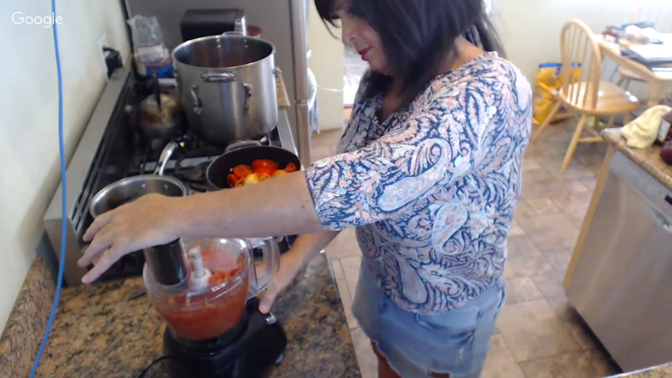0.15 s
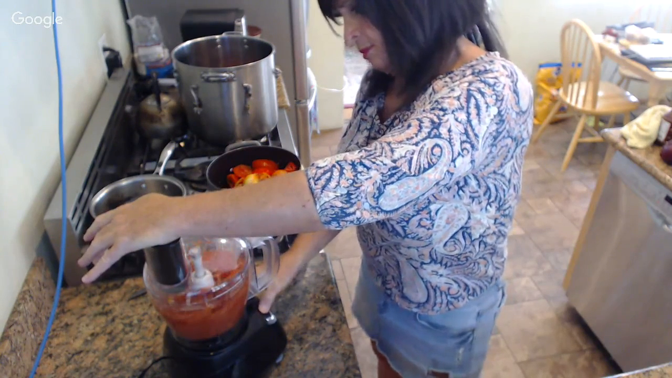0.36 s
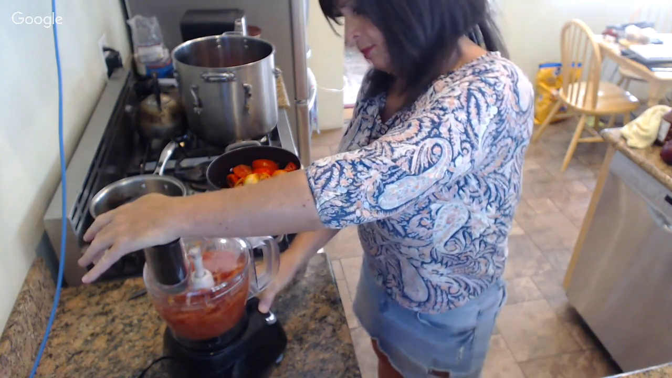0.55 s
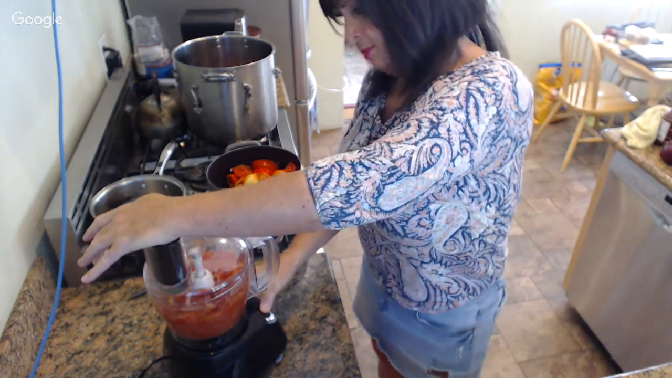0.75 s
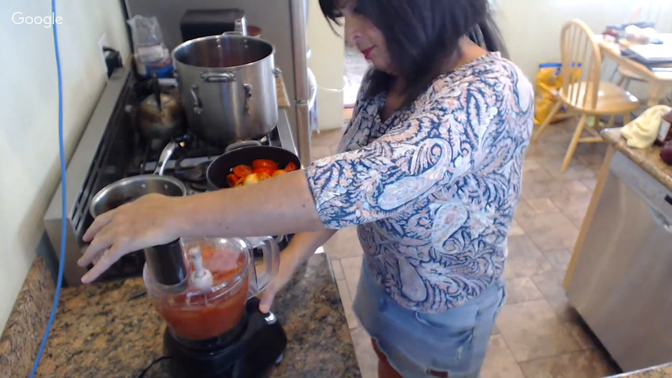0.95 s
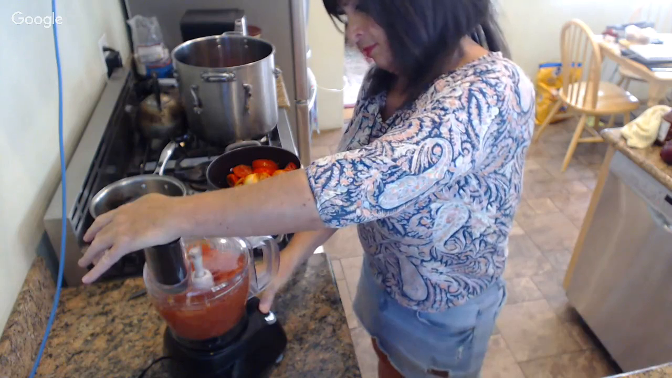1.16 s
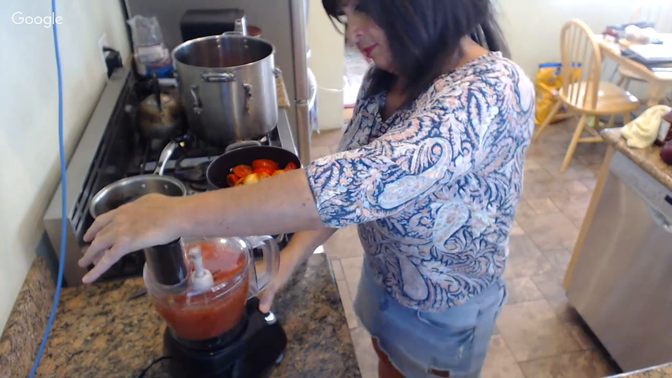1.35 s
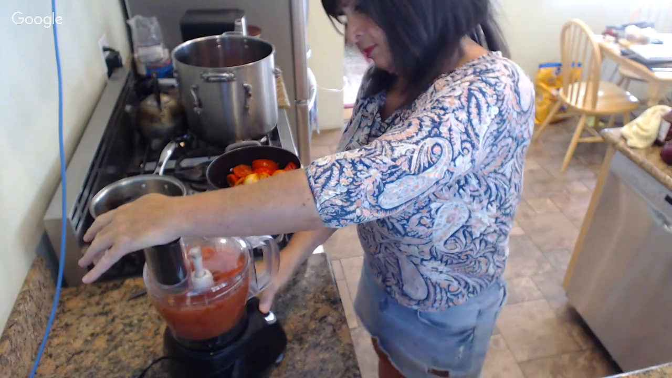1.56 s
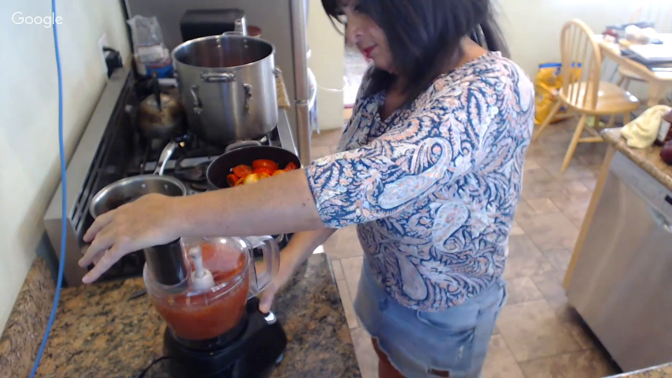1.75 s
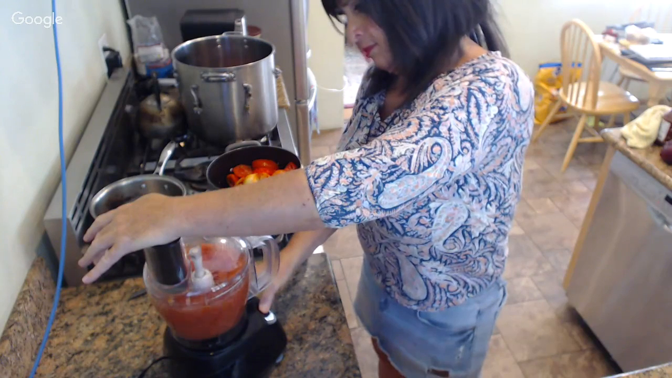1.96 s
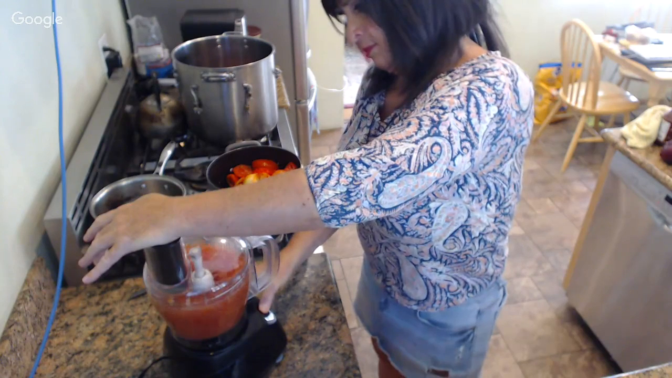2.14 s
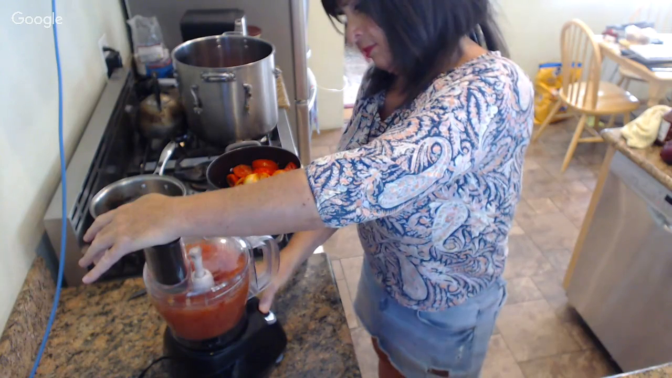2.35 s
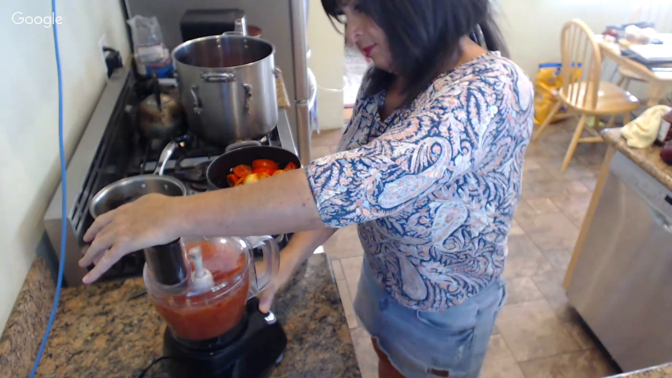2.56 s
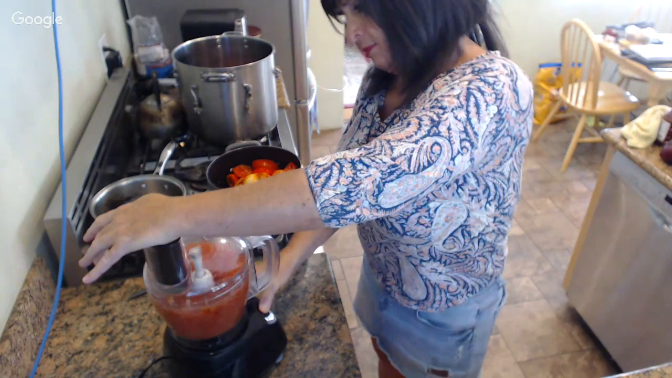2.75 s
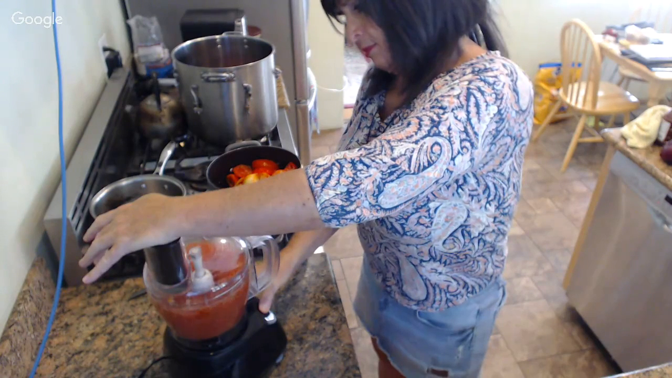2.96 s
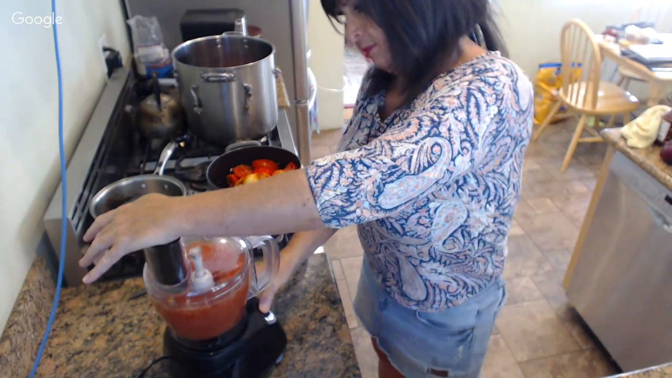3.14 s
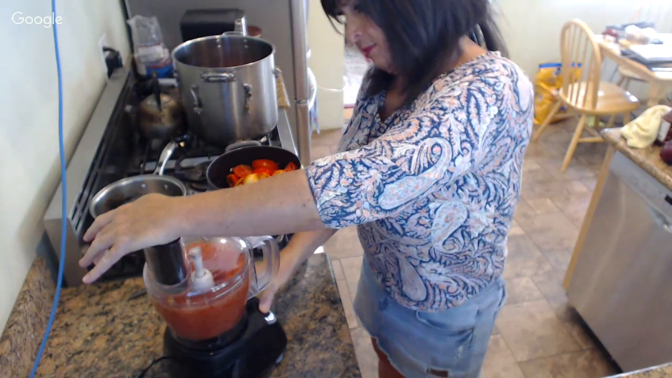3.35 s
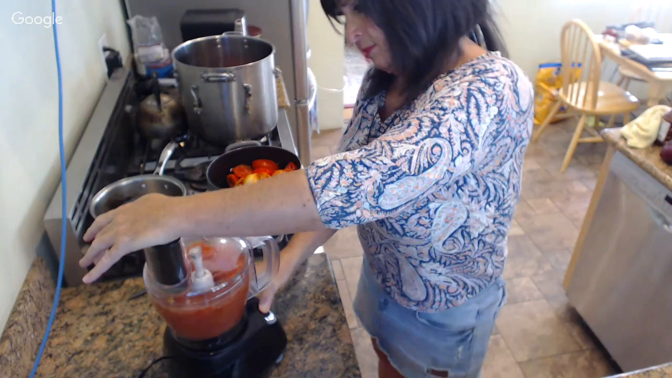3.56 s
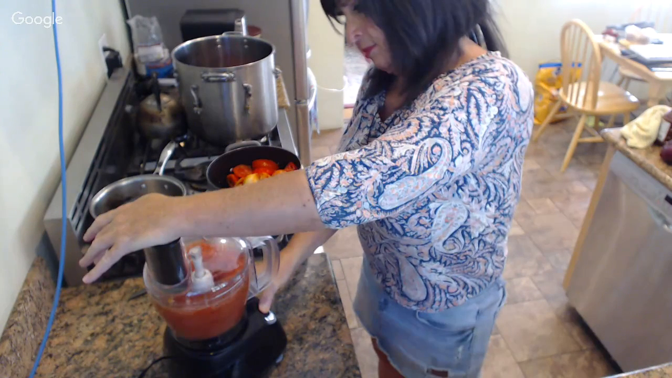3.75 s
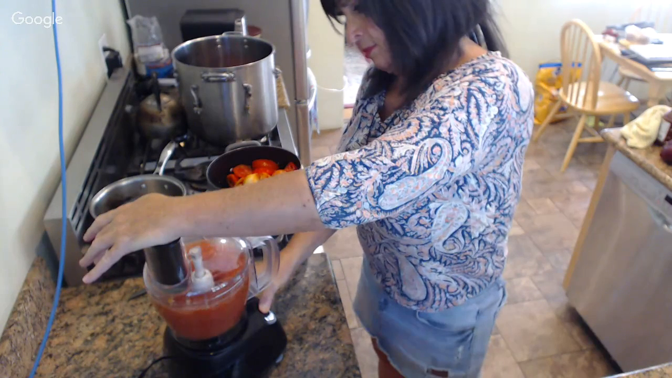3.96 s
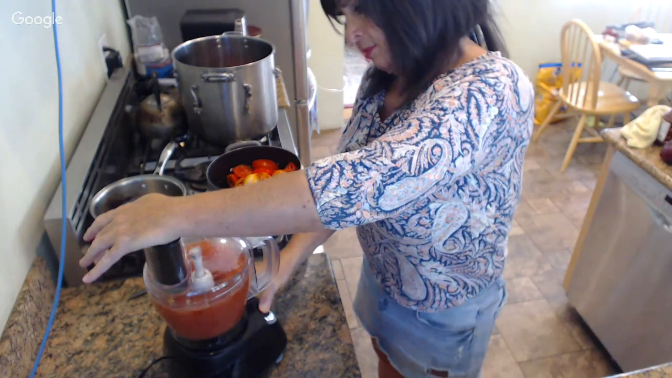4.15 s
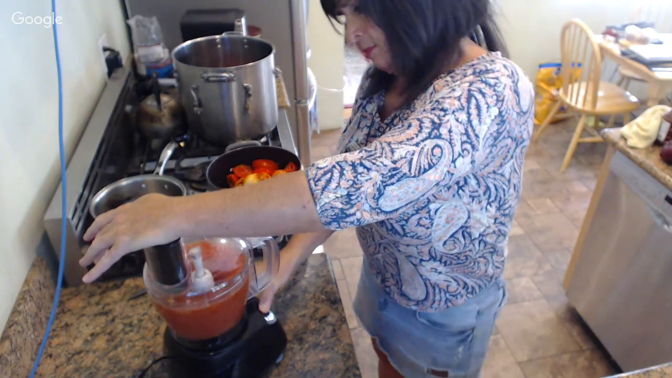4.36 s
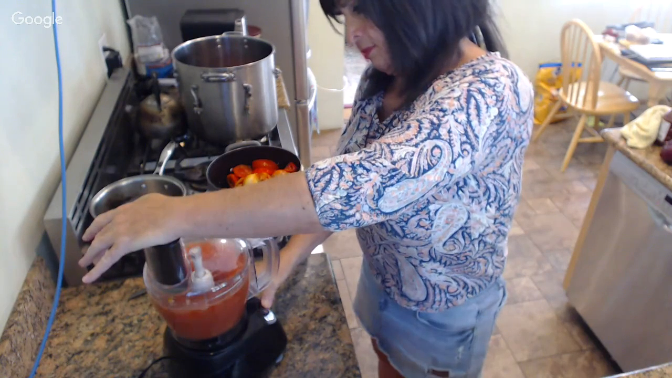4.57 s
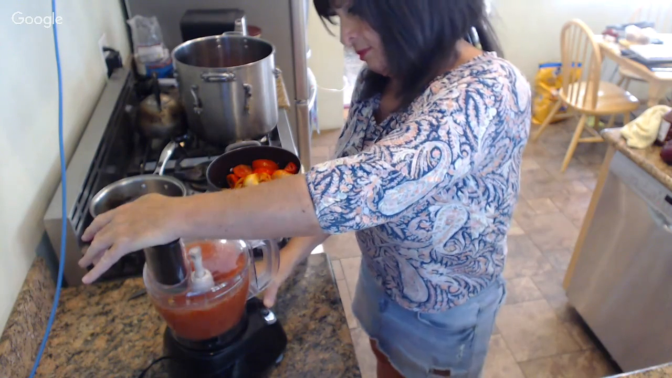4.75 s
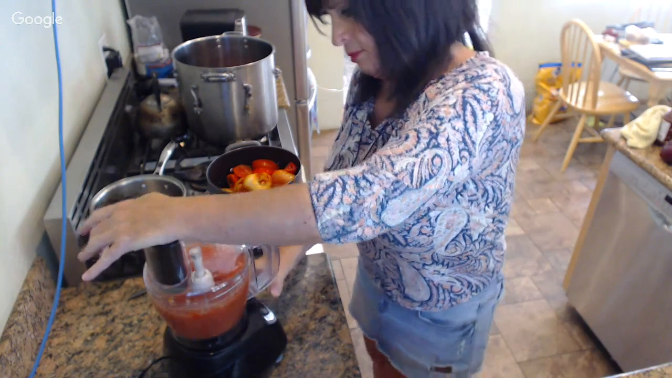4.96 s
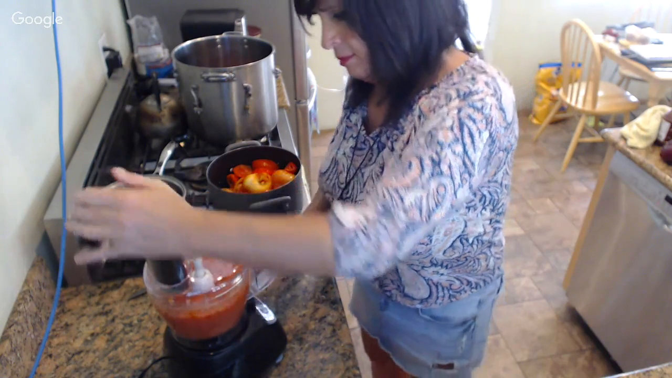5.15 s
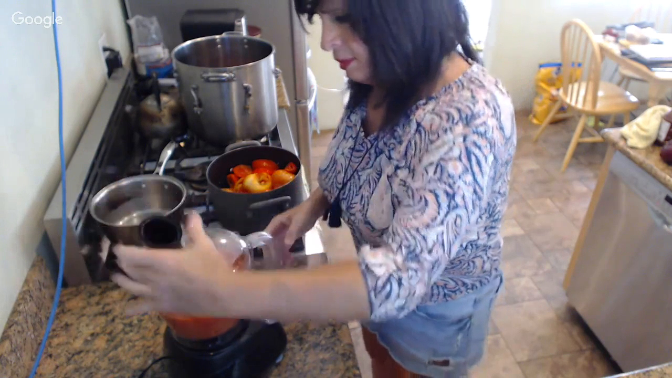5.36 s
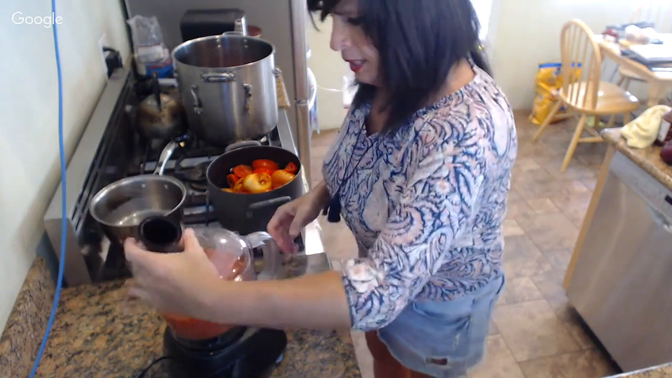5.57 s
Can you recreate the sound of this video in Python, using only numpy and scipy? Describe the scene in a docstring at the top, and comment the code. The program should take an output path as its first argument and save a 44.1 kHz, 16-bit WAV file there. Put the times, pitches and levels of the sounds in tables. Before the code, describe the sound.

Close, slightly dull small microphone in a home kitchen: the tail of one food processor pulse runs down to near silence, then the motor starts with a knock and loud roar. Wet tomato pulp glugs and slosh-slaps the bowl, thinning into a steadier whirr with brief high chirps, dropouts and scrapes, before the machine growls, whines and coasts to a stop, leaving faint hush.

```python
"""A food processor chops tomatoes on a kitchen counter; shaped noise makes its whirr, hiss, pulp and room.
First one pulse runs down; then a jolt of low and higher tones and a loud, sagging roar open a long run.
Wobbling tones glug and noise bursts slosh as pulp churns in the bowl and settles into sauce; blades throb.
High whistles chirp over short dropouts, fizz flickers, bits of skin scrape and the blade sings thinly.
The motor growls, rasps and whines as it coasts to a stop; a faint hush is left."""
import sys
import numpy as np
from scipy import signal
from scipy.fft import rfft, irfft
from scipy.io import wavfile

SR = 44100
rng = np.random.default_rng(int(sys.argv[2]) if len(sys.argv) > 2 else 0)


def transcribe(u):
    """Save the signal u as a 16-bit wav file named by the first command-line argument.

    u: samples, shape (n,) or (channels, n), limited to [-1, 1]; the rate is SR.
    q: integer samples, one column per channel.
    """
    v = np.clip(np.atleast_2d(u).T, -1, 1)
    q = np.round(v * 32767).astype(np.int16)
    wavfile.write(sys.argv[1], SR, q)


N = 247401
TIME = np.arange(N) / SR   # s


def from_db(db):
    """Turn decibels into a gain."""
    return 10 ** (np.asarray(db) / 20)


def rms_one(x):
    """Scale to an rms (average strength) of 1."""
    return x / np.sqrt(np.mean(x ** 2) + 1e-20)


def drift(rate):
    """Smooth chance that changes about rate times a second; spread 1."""
    hz = np.arange(N // 2 + 1) * SR / N
    smooth = rfft(rng.standard_normal(N)) / (1 + (hz / rate) ** 2)
    return rms_one(irfft(smooth, N))


def bounded(x, limit=0.95):
    """Round off the extremes of a chance curve."""
    return limit * np.tanh(x / limit)


def swell(at, length, order=2):
    """A bell of height 1, length wide at half height; a higher order squares it off."""
    distance = np.abs(2 * (TIME - at) / length)
    return np.exp2(-np.minimum(distance ** order, 60))


def below(speed, threshold, softness=0.025):
    """0 above a speed, 1 below it, with a soft step between."""
    return 0.5 - 0.5 * np.tanh((speed - threshold) / softness)


def in_time(rows):
    """Each column of a curve, joined by straight lines in time."""
    s, *columns = np.transpose(rows)
    return [np.interp(TIME, s, column) for column in columns]


def turbulence(spectrum, resonances=(), liveliness=1):
    """Noise with a broad colour, lifted at each resonance by its lift times liveliness; rms 1."""
    hz = np.arange(N // 2 + 1) * SR / N + 1e-3   # the small offset avoids log of 0
    points_hz, points_db = np.transpose(spectrum)
    colour = np.interp(np.log(hz), np.log(points_hz), points_db)
    # above the last point the colour falls steeply
    colour = colour - 80 * np.log10(np.maximum(hz / points_hz[-1], 1))
    for centre, width, lift in resonances:
        colour = colour + liveliness * lift / (1 + (2 * (hz - centre) / width) ** 2)
    return rms_one(irfft(rfft(rng.standard_normal(N)) * from_db(colour), N))


def wavering(x, wander=0.012, flicker_db=2.5, bend=0):
    """Shifting pulp moves a resonance in pitch, on top of any steady bend, and makes it come and go."""
    shift_s = np.cumsum(bend + wander * drift(12)) / SR
    bent = np.interp(TIME + shift_s, TIME, x)
    return rms_one(bent * from_db(flicker_db * drift(21)))


# colour of the quiet kitchen: (f/Hz, relative level/dB)
ROOM_COLOUR = [(35, -19.5), (60, -2), (77, -9), (328, 1.5), (600, -12.5), (8000, -27.5), (10400, -61)]


def room():
    """Soft, steady noise fills the quiet kitchen."""
    return from_db(-80) * turbulence(ROOM_COLOUR)


# colour of the faint hush: (f/Hz, relative level/dB)
HUSH_COLOUR = [(18, -35), (30, -14), (234, -8), (532, -9), (2040, -13.5), (7000, -38), (9100, -75.5)]


def hush(level_db=-62.5, start_s=5.432, rise_s=0.01):
    """A faint noise comes up as the machine nears standstill, and stays."""
    return from_db(level_db) * turbulence(HUSH_COLOUR) * np.clip((TIME - start_s) / rise_s, 0, 1)


def fizz_noise():
    """Fine, high fizz made of noise; rms 1."""
    return turbulence([(3000, -20), (6000, -7.5), (7400, -3.5), (8200, -19.0), (9200, -19)])


# moments when the treble fizzes: (t/s, length/s, level/dB)
FIZZ_BURSTS = [(1.999, 0.058, -36), (2.293, 0.03, -38.5), (4.153, 0.034, -39.5)]


def fizz():
    """Short bursts of fine, high fizz."""
    level = sum(from_db(db) * swell(s, length, order=4) for s, length, db in FIZZ_BURSTS)
    return fizz_noise() * level


# chirps and the dropouts under them: (t/s, dropout length/s, chirp level before flutter/dB,
# level change of the machine/dB)
CHIRP_EVENTS = [(1.616, 0.027, -50, -13.5), (3.583, 0.021, -38, -29), (4.085, 0.0065, -37, 1),
                (4.227, 0.011, -38.5, -12.5), (4.245, 0.0083, -42, -7), (4.339, 0.008, -35.5, -18),
                (4.423, 0.013, -37, -9), (4.439, 0.015, -35, -8.5), (4.534, 0.012, -38.5, -9.5),
                (4.58, 0.01, -39, -5.5)]


def chirps(pitch_hz=8060, wobble=0.013, flutter_db=3.0, stretch=1.62, fringe_db=-0.5):
    """Short, slightly unsteady whistles around one high pitch, fringed with fizz."""
    # stretch: a chirp outlasts its dropout
    level = sum(from_db(db) * swell(s, stretch * length, order=6) for s, length, db, _ in CHIRP_EVENTS)
    cycles = np.cumsum(pitch_hz * (1 + wobble * drift(290))) / SR
    tone = np.sqrt(2) * np.sin(2 * np.pi * cycles)
    fringe = turbulence([(5000, -14.5), (7150, 6), (7650, 7.5), (8300, -16), (9300, -1)])
    return (tone + from_db(fringe_db) * fringe) * level * from_db(flutter_db * drift(110))


def dropouts():
    """The machine's level changes briefly at each chirp, nearly always a dip."""
    return from_db(sum(change_db * swell(s, length, order=6) for s, length, _, change_db in CHIRP_EVENTS))


# thin singing of the steel blade: (t/s, length/s, f/Hz, width/Hz, level/dB)
BLADE_SONGS = [(3.82, 0.3, 6000, 18, -51.5), (4.55, 0.55, 5220, 160, -53)]


def blade_rings():
    """Rubbed by the pulp, the blade rings in narrow, high bands."""
    total = 0
    for s, length, hz, width, db in BLADE_SONGS:
        turn = 2 * np.pi * hz * TIME
        band = drift(width) * np.sin(turn) + drift(width) * np.cos(turn)
        total = total + from_db(db) * swell(s, length, order=4) * band
    return total


# colour of skin against the wall: (f/Hz, relative level/dB)
SCRAPE_COLOUR = [(1900, -17), (2550, 1.5), (3100, 4), (3700, -3), (4300, -11), (5500, -24)]
# bits of skin scraping round the wall once the blades cut clear: (t/s, length/s, level/dB)
SKIN_SCRAPES = [(3.77, 0.27, -38.5), (4.024, 0.19, -38), (4.296, 0.061, -38), (4.491, 0.079, -37.5)]


def scrapes(grain_db=5):
    """Bits of skin dragged along the wall give a rough, bright rasp."""
    grains = rms_one(turbulence(SCRAPE_COLOUR) * from_db(grain_db * bounded(drift(120))))
    return grains * sum(from_db(db) * swell(s, length, order=4) for s, length, db in SKIN_SCRAPES)


# waves of pulp thrown against the wall: (t/s, centre f/Hz, length/s, level/dB)
PULP_WAVES = [(1.765, 614, 0.044, -17), (1.892, 490, 0.024, -13), (1.901, 730, 0.07, -20.5),
              (1.95, 470, 0.041, -21), (1.982, 640, 0.042, -17), (2.133, 600, 0.044, -23),
              (2.216, 560, 0.094, -16), (2.337, 520, 0.048, -20), (2.406, 426, 0.029, -19),
              (2.491, 510, 0.063, -22.5), (2.533, 474, 0.023, -21), (2.571, 505, 0.044, -18),
              (2.759, 445, 0.035, -25.5), (3.245, 430, 0.029, -30), (3.613, 384, 0.014, -24)]


def sloshes(edge_db=-5, skirt_db=-30):
    """Each wave of pulp slaps the wall with a wet burst about an octave wide."""
    total = 0
    for s, hz, length, db in PULP_WAVES:
        low_side = [(hz / 2, skirt_db), (hz / np.sqrt(2), edge_db)]
        high_side = [(hz * np.sqrt(2), 2 * edge_db), (hz * 2, skirt_db)]
        burst = turbulence(low_side + [(hz, 0)] + high_side)
        total = total + from_db(db) * swell(s, length, order=4) * burst
    return total


# air pockets folding into the pulp: (t/s, f before wobble/Hz, length/s, level before flutter/dB)
AIR_POCKETS = [(0.14, 276.6, 0.043, -45.5), (0.293, 255, 0.071, -54), (1.212, 231, 0.03, -19.5),
               (1.586, 210, 0.025, -15.5), (1.765, 148.8, 0.019, -16.5), (1.815, 292.7, 0.022, -17),
               (1.875, 175, 0.025, -15), (1.966, 231.3, 0.031, -14), (2.012, 245.6, 0.012, -10),
               (2.05, 165, 0.0088, -14), (2.08, 210, 0.013, -13), (2.118, 150, 0.026, -15),
               (2.171, 290, 0.023, -17), (2.242, 200, 0.033, -17.5), (2.306, 185, 0.028, -18.5),
               (2.398, 149, 0.025, -12.5), (2.431, 370.5, 0.015, -13.5), (2.509, 189.7, 0.014, -19.5),
               (2.535, 237, 0.021, -23), (2.659, 345, 0.012, -17), (2.699, 148, 0.02, -19),
               (2.755, 340, 0.016, -18), (2.998, 319.3, 0.035, -25.5), (3.375, 155, 0.022, -27),
               (4, 185, 0.024, -38.5), (4.162, 147, 0.032, -32), (4.257, 245, 0.026, -27),
               (4.378, 267, 0.0098, -25), (4.401, 239.5, 0.016, -26), (4.465, 153, 0.027, -34),
               (4.618, 225, 0.06, -48), (5.172, 676, 0.02, -56.5), (5.198, 269, 0.02, -57.5),
               (5.307, 302, 0.016, -65), (5.328, 480, 0.016, -70)]
# colour of wet splashing, also used for the pulp below: (f/Hz, relative level/dB)
SPLASH_COLOUR = [(150, -32.5), (330, -0.5), (430, 2.5), (650, 0), (850, -4.5), (1100, -17), (1800, -23)]


def glugs(wobble=0.084, flutter_db=4.0, slap_db=-12):
    """Each air pocket closes with a wet slap and rings at a pitch that wobbles as the pulp squeezes it."""
    squeezed_time = np.cumsum(1 + wobble * drift(92.5)) / SR
    slap = from_db(slap_db) * turbulence(SPLASH_COLOUR)
    pockets = 0
    for s, hz, length, db in AIR_POCKETS:
        ring = np.sqrt(2) * np.sin(2 * np.pi * hz * squeezed_time)
        pockets = pockets + from_db(db) * swell(s, length) * (ring + slap)
    return pockets * from_db(flutter_db * drift(110))


# colour of the low churn: (f/Hz, relative level/dB)
CHURN_COLOUR = [(25, -4.5), (55, -14), (80, -21), (100, -9), (125, -1), (240, 2), (330, -0.5), (450, -9),
                (800, -32)]


def pulp(splash_db, churn_db, load, slosh_db=1.0, lumps_db=1.46, loose_lumps_db=4.5):
    """Lumps thrown round the bowl: a low churn and a wet, sloshing splash that surge together."""
    churn = from_db(churn_db) * turbulence(CHURN_COLOUR)
    splash = from_db(splash_db + slosh_db * bounded(drift(25))) * turbulence(SPLASH_COLOUR)
    # the pulp is less even when the blades cut clear
    unevenness_db = lumps_db + loose_lumps_db * (1 - load)
    return (churn + splash) * from_db(unevenness_db * bounded(drift(27)))


# low and higher rings of the jolt: (f/Hz, starting level/dB, time to fall 60 dB/s)
JOLT_RINGS = [(109.5, -25, 0.38), (200, -35.5, 0.091), (520, -36, 0.06), (1480, -24.5, 0.07)]


def kick(start_s=0.812):
    """The starting torque jolts the machine on the counter: a short knock of low and higher rings."""
    age = np.maximum(TIME - start_s, 0)
    return sum(from_db(db - 60 * age / t60) * np.sin(2 * np.pi * hz * age) for hz, db, t60 in JOLT_RINGS)


# presses of the switch: (on t/s, off t/s, standstill t/s, base whirr level/dB, base hiss level/dB,
# base whine level against the whirr/dB)
SWITCH_PRESSES = [(-0.5, 0.05, 0.4, -30, -45.5, -26), (0.8, 4.57, 5.51, -27.5, -38, -3)]


def press(on, off, standstill, spin_up_s=0.038):
    """Speed 0-1: the motor spins up quickly, then friction slows it at a steady rate."""
    spin_up = 1 - np.exp(-np.maximum(TIME - on, 0) / spin_up_s)
    return spin_up * np.clip((standstill - TIME) / (standstill - off), 0, 1)


def drive():
    """The motor's speed, and the three levels of whichever press is turning it."""
    speeds = np.array([press(*row[:3]) for row in SWITCH_PRESSES])
    levels = np.array(SWITCH_PRESSES)[speeds.argmax(axis=0), 3:]
    return np.maximum(speeds.max(axis=0), 1e-3), levels.T   # a tiny speed avoids log of 0


def roar(start_s=0.78, end_s=1.82, release_s=0.029):
    """Lift of the whirr and of the hiss in dB: the whirr's lift sags, then both fall away at once."""
    held = (TIME > start_s) * np.clip((end_s - TIME) / release_s, 0, 1)
    whirr_lift_db = 18 - 4 * (TIME - start_s)   # sags 4 dB a second
    return held * whirr_lift_db, held * 14.5


def blade_beat(speed, blade_hz=101, wander=0.025):
    """The blades pass at a slightly wandering rate that follows the motor's speed."""
    turn = 2 * np.pi * np.cumsum(blade_hz * speed * (1 + wander * drift(16))) / SR
    return np.sin(turn) + np.sin(2 * turn)


# colour of the coasting rasp: (f/Hz, relative level/dB)
RASP_COLOUR = [(1000, -13.5), (1250, -6.5), (2000, -3.5), (2450, 1), (3000, -3.5), (3700, -5.5),
               (4300, -16), (5500, -18.5)]
# resonances of the housing, also used for the motor below: (f/Hz, width/Hz, lift before liveliness/dB)
HOUSING_RESONANCES = [(1050, 30, 8.5), (1440, 120, 8), (1573, 28, 14), (1750, 22, 4.5), (1810, 36, 5.5),
                      (2010, 22, 2.5), (2310, 40, 6.5), (2440, 34, 1.5), (2720, 65, 5.5), (2954, 50, 2),
                      (3110, 32, 6), (3590, 70, 4), (3870, 49, 3)]


def rasp(speed, grain_db=5.5, base_db=-36, db_per_decade=45):
    """Below full speed the drive chatters dryly; the chatter fades towards standstill."""
    noise = turbulence(RASP_COLOUR, HOUSING_RESONANCES, 0.8)
    grains = rms_one(noise * from_db(grain_db * bounded(drift(90))))
    return from_db(base_db + db_per_decade * np.log10(speed)) * (1 - speed) * grains


# resonances in the motor's whine, before it bends: (f/Hz, width/Hz, lift before liveliness/dB)
WHINE_RESONANCES = [(2310, 33, 11), (2460, 41, 18.5), (2420, 50, 8), (2657, 41, 12), (2715, 43, 10.5)]


def motor_whine(whine_db, speed, rise=0.08, stop_speed=0.23, stop_db=-19):
    """The motor rings in narrow bands that bend up towards standstill and die at very low speed."""
    colour = [(2000, -22.5), (2320, 2.5), (2500, 1.0), (2900, 0.5), (3900, -11.0)]
    noise = turbulence(colour, WHINE_RESONANCES, 0.67)
    tone = wavering(noise, flicker_db=2.0, bend=rise * (1 - speed) ** 4)
    return from_db(whine_db) * tone * from_db(stop_db * below(speed, stop_speed))


# hollow resonances of the bowl: (f/Hz, width/Hz, lift/dB)
BOWL_RESONANCES = [(852, 50, 8), (963, 99, 15), (1034, 39, 7)]


def hollow_bowl(ring_db):
    """The bowl rings hollowly in a few bands that waver."""
    noise = turbulence([(600, -50.5), (840, 3.0), (1040, 1.0), (1250, -28.5)], BOWL_RESONANCES)
    return from_db(ring_db) * wavering(noise, flicker_db=0.7)


# colours of the free whirr, of the whirr under pulp, of the hiss and of the growl:
# (f/Hz, relative level/dB)
FREE_WHIRR_COLOUR = [(100, -41.5), (500, -25), (780, -12), (950, -8), (1180, -3), (1450, -3.5), (1800, -1),
                     (2200, 0), (2700, -4), (3200, -7), (4000, -15), (6000, -43)]
LOADED_WHIRR_COLOUR = [(400, -24), (780, 1.5), (1000, 0), (1250, 0.5), (1550, .5), (2550, 0.5), (3200, -7),
                       (4200, -26), (6000, -30.5)]
HISS_COLOUR = [(2200, -25.5), (3300, 2), (3900, 2.5), (5000, 1), (6100, -2.5), (7000, -8), (7700, -20),
               (8400, -28.5), (9300, -54)]
GROWL_COLOUR = [(1150, -23), (1450, 3.5), (1620, 2.5), (2000, -5.5), (2300, -20.5)]
# growls while the motor changes speed: (t/s, length/s, level against the whirr before sharing/dB)
SPEED_GROWLS = [(0.891, 0.18, -3), (4.747, 0.14, 1.5), (4.89, 0.088, 2.5)]


def motor(whirr_db, hiss_db, ring_db, whine_db, load, speed, air, beat,
          throb_db=0.23, uneven_db=0.7, flutter_db=1.4, damped=0.17, growl_takes=0.45):
    """Fan and gear noise ring in the housing and throb with the blades; pulp damps the resonances."""
    free = np.sqrt(1 - load) * turbulence(FREE_WHIRR_COLOUR, HOUSING_RESONANCES, 0.94)
    loaded = np.sqrt(load) * turbulence(LOADED_WHIRR_COLOUR, HOUSING_RESONANCES, damped)
    growl_gain = sum(from_db(db) * swell(s, length, order=4) for s, length, db in SPEED_GROWLS)
    growl = growl_gain * turbulence(GROWL_COLOUR, HOUSING_RESONANCES, 0.41)
    # whine and growl each take a share of the whirr's power
    sharing = np.sqrt(1 + from_db(whine_db) ** 2 + growl_takes * growl_gain ** 2)
    shared = (air * (free + loaded) + motor_whine(whine_db, speed) + growl) / sharing
    whirr = from_db(whirr_db) * (shared + hollow_bowl(ring_db))
    hiss_level = from_db(hiss_db + flutter_db * (1 - load) * drift(22))
    hiss = hiss_level * turbulence(HISS_COLOUR, HOUSING_RESONANCES)
    return (whirr + air * hiss) * from_db(throb_db * beat + uneven_db * drift(35))


# how hard the blades work the pulp at full speed, before it surges: they catch it, the lumps break down,
# then they cut mostly clear: (t/s, churn level/dB, splash level/dB)
PULP_CURVE = [(0.3, -54.5, -41.5), (0.82, -18.5, -20), (0.92, -33.5, -23.5), (0.99, -18.5, -19.5),
              (1.3, -17.5, -15), (1.55, -14.5, -16.5), (1.8, -13.5, -15), (1.98, -14.5, -31.5),
              (2.06, -15.5, -29.5), (2.4, -23, -33), (2.46, -26, -29), (2.8, -28.5, -28.5),
              (3.56, -30, -31), (3.64, -43, -41.5), (3.78, -36.5, -37), (3.87, -46, -48),
              (3.97, -42, -39.5), (4.07, -44, -41), (4.5, -43, -39), (4.54, -42.5, -44), (4.66, -54, -53),
              (4.82, -70, -57)]
# how far the hollow ring of the bowl stands over the whirr: (t/s, level/dB)
BOWL_CURVE = [(0.05, -4), (0.25, -1.5), (0.36, 2), (0.849, -2.5), (0.96, -17.5), (4.5, -21.5), (4.68, -10),
              (4.85, -7.5), (4.98, -14), (5.06, -4), (5.14, -14.5), (5.22, -22)]


def processor():
    """Speed sets the level of machine and pulp; harder churning damps the housing and the whine."""
    speed, (whirr_db, hiss_db, whine_db) = drive()
    decades = np.log10(speed)   # tenfold steps of speed
    roar_db, roar_hiss_db = roar()
    churn_db, splash_db = in_time(PULP_CURVE)
    ring_db, = in_time(BOWL_CURVE)
    # load 0-1: half when churn is 8.5 dB under the whirr, with a soft change around it
    load = 0.5 + 0.5 * np.tanh((churn_db - whirr_db - roar_db + 8.5) / 5)
    whirr_db = whirr_db + 47.5 * decades + roar_db
    hiss_db = hiss_db + 66 * decades + 2.5 * load + roar_hiss_db
    # the whine comes through near standstill, sinks under load and is not lifted by the roar
    whine_db = whine_db + 5.5 * (1 - speed) ** 2 - 22 * load - roar_db
    air = from_db(-6.5 * below(speed, 0.33))   # at low speed the rush of air falls away
    machine = motor(whirr_db, hiss_db, ring_db, whine_db, load, speed, air, blade_beat(speed))
    food = from_db(35.5 * decades) * pulp(splash_db, churn_db, load)
    return machine + air * rasp(speed) + scrapes() + blade_rings() + food + glugs() + sloshes()


def scene():
    """The machine and its load in a quiet kitchen, with brief dropouts and chirps on top."""
    machine = dropouts() * processor()
    return (machine + kick() + chirps() + fizz() + hush() + room())[None]


def record(dry, low_cut_hz=84, ceiling=0.97, dull_hz=8300, cutoff_hz=9335):
    """The small microphone drops the deep bass, flattens the loudest peaks and rounds off and cuts the top."""
    x = signal.sosfilt(signal.butter(3, low_cut_hz, "high", fs=SR, output="sos"), dry)
    x = x / (1 + (x / ceiling) ** 12) ** (1 / 12)
    x = signal.sosfilt(signal.butter(8, dull_hz, fs=SR, output="sos"), x)
    return signal.sosfilt(signal.cheby2(12, 24, cutoff_hz, fs=SR, output="sos"), x)


dry = scene()
out = record(dry)
transcribe(out)
```